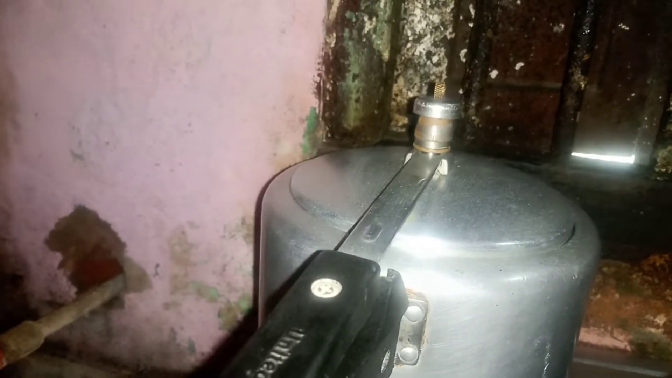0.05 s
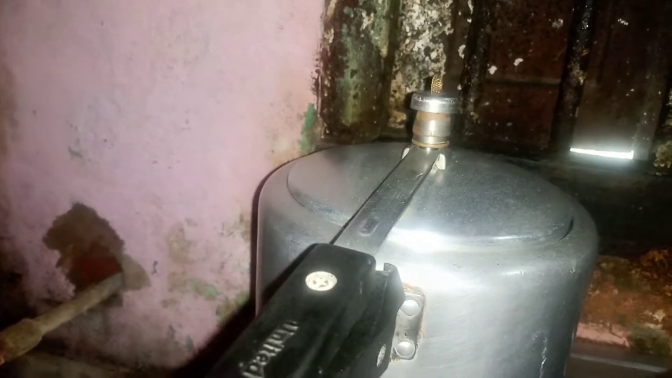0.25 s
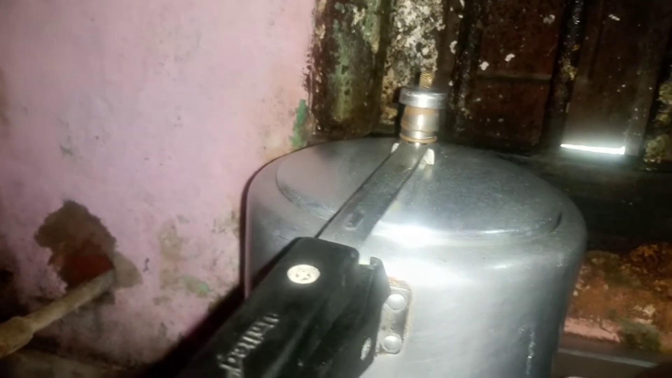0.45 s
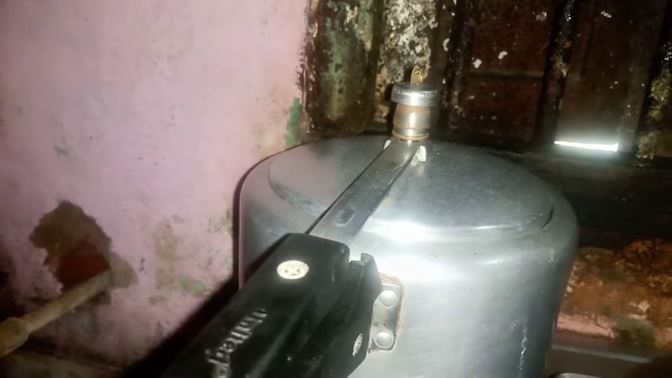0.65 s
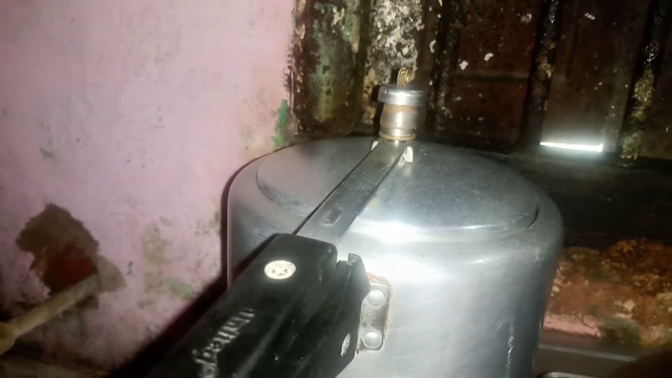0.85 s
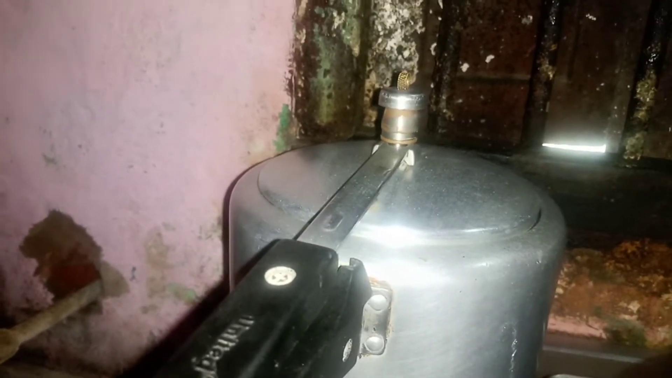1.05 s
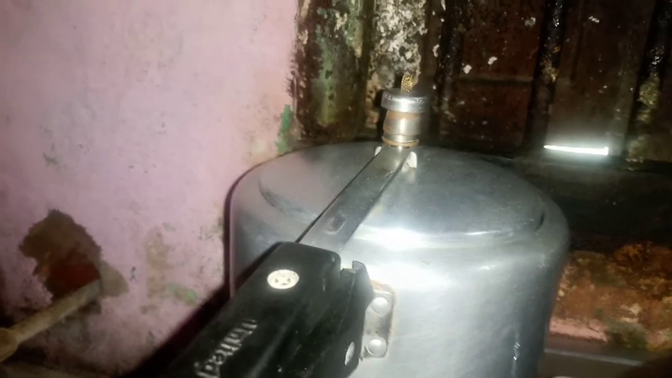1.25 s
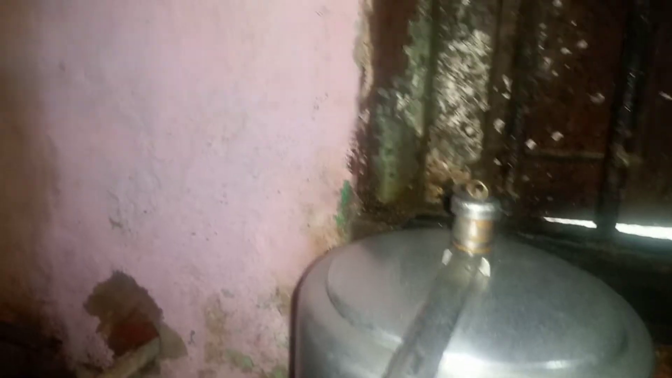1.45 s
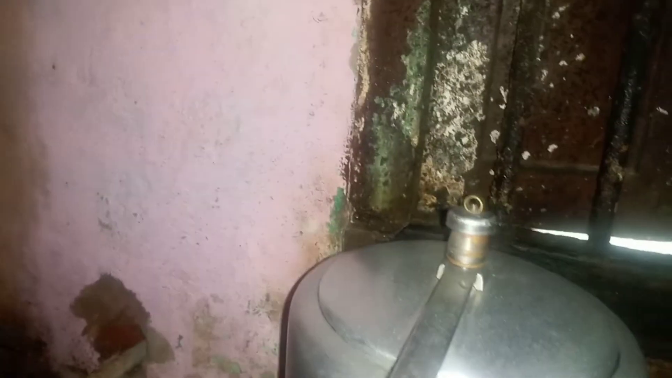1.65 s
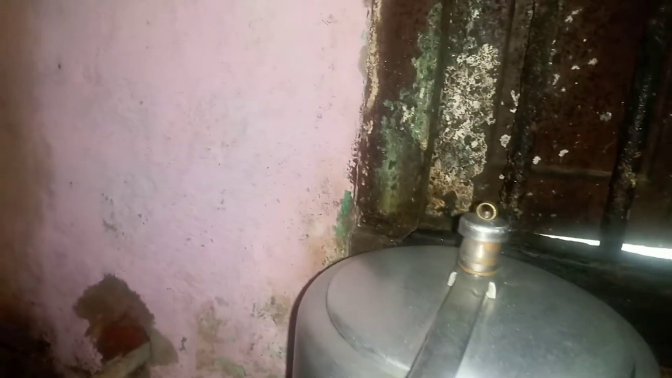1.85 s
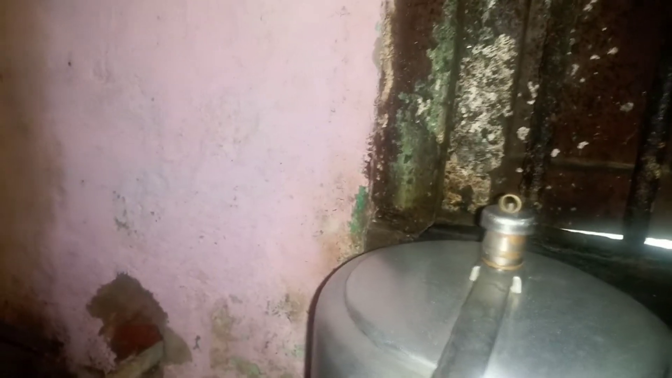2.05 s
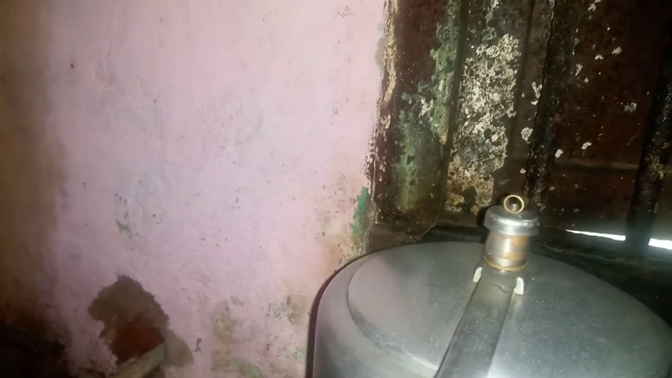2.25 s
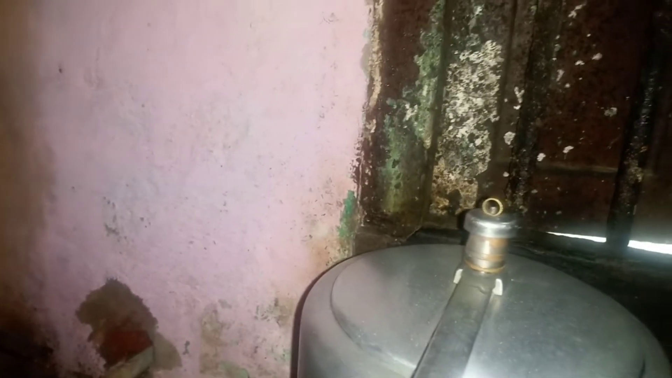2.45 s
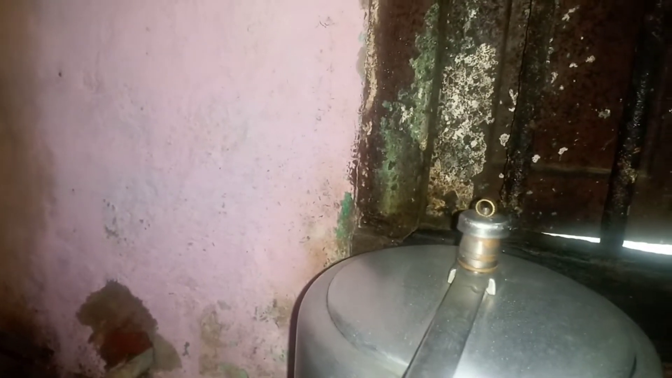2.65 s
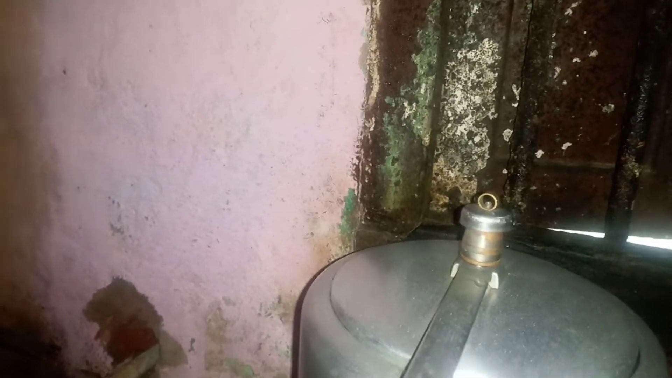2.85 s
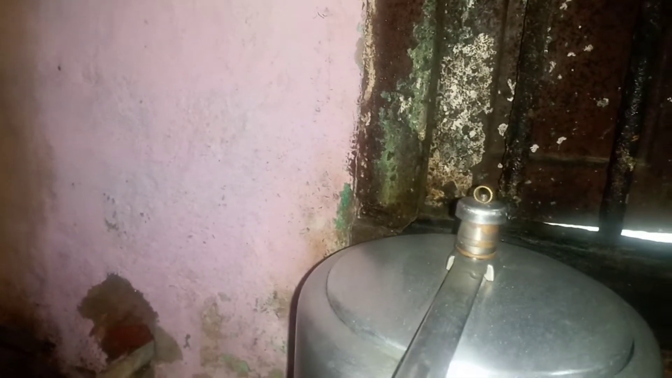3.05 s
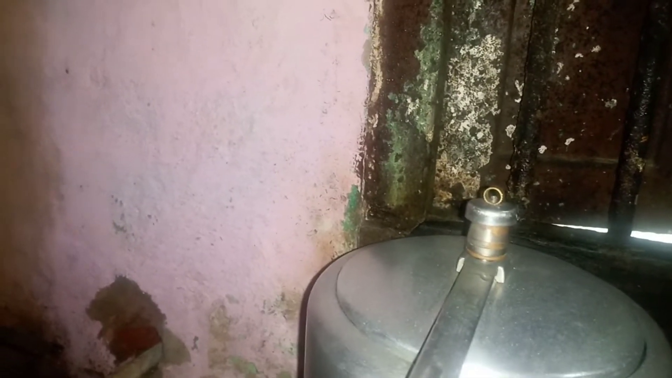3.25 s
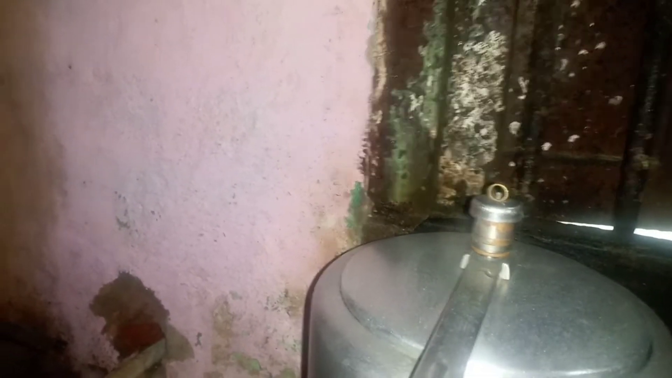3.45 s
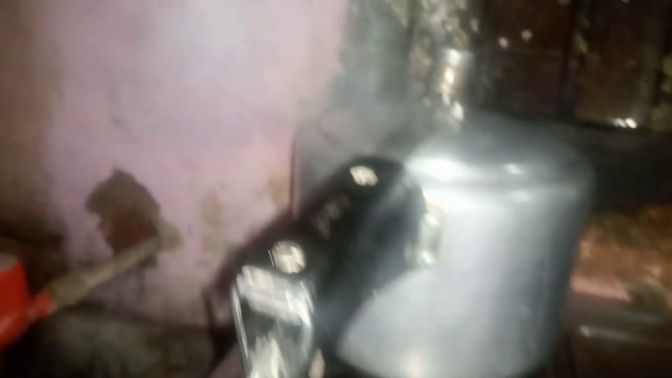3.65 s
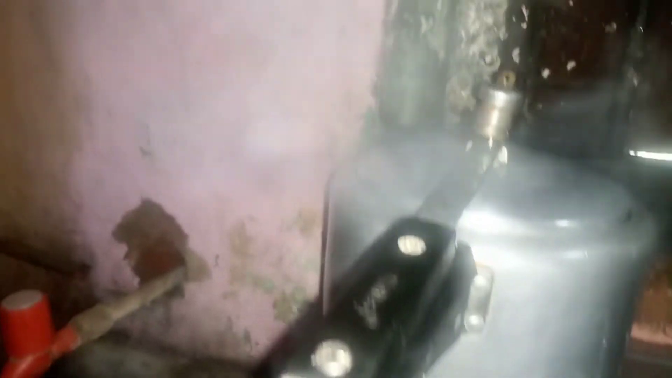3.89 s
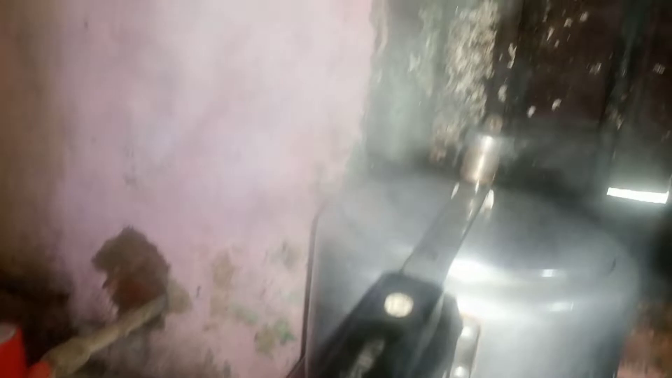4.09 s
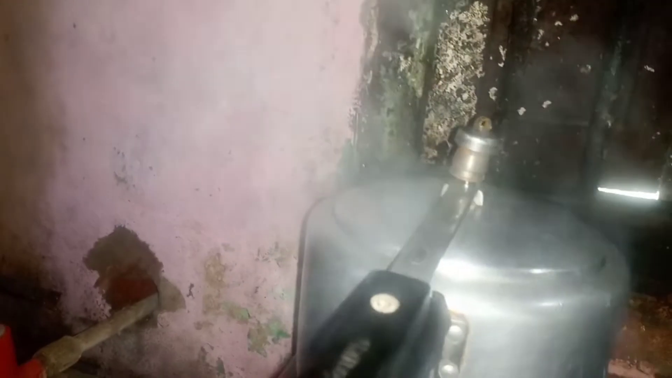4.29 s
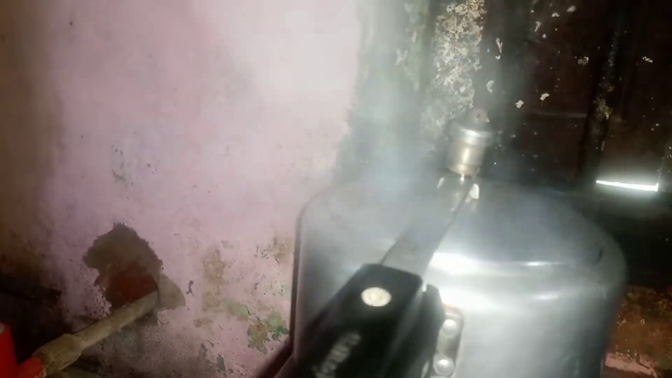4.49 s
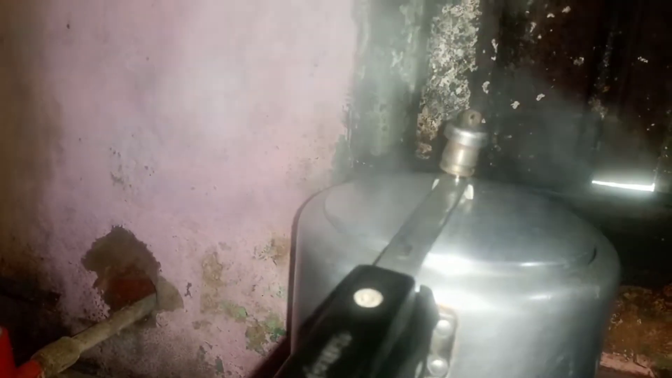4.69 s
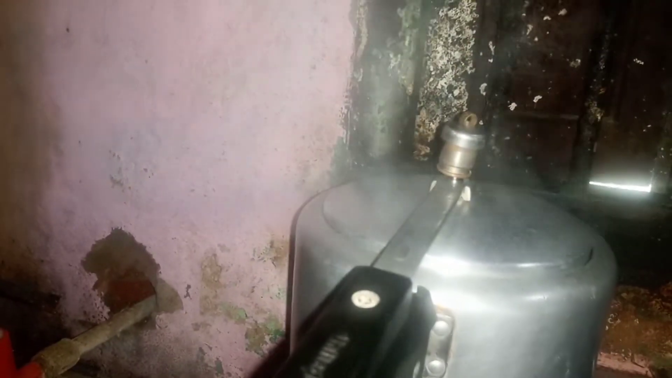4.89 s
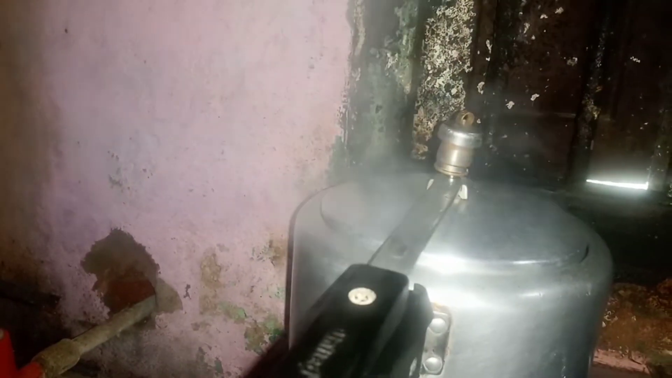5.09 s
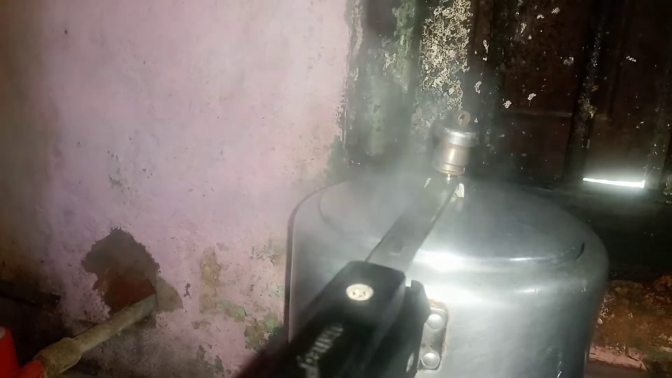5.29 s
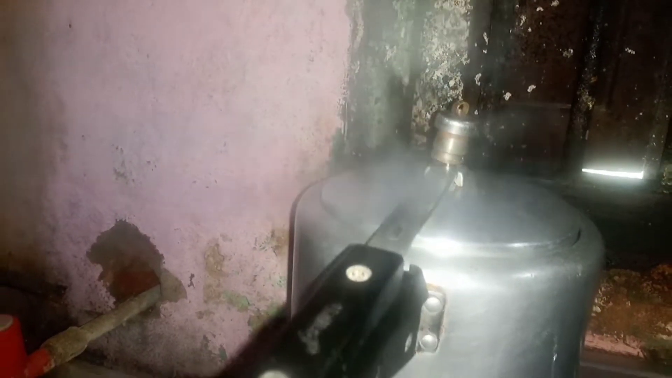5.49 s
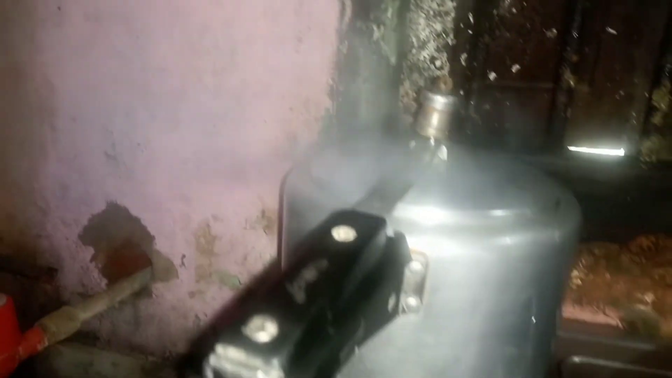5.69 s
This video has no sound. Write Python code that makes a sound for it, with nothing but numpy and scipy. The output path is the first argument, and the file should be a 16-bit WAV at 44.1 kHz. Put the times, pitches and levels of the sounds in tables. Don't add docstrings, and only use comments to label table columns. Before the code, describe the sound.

A pressure cooker on a gas flame, heard very close in a small kitchen with short hard reflections. From 0 to 1.2 seconds, steam leaks as a bright, grainy hiss, strongest around 6 to 7 kHz, fluttering and choking noticeably near 0.45 and 1.05 seconds. A faint low burner rumble, bubbling simmer and narrow pot hum lie underneath, the hum swelling around 0.3 to 0.45. The sound stops dead for under a tenth of a second. From 1.3 to 3.46 a much weaker leak fades in, thin and shifting in colour, lifting slightly near 2 and 2.7, with small hum swells. After another brief silence, from 3.54 a strong, steadier jet quickly rises into a piercing, airy roar. From about 3.6 its turbulent wind hits the microphone in irregular pops, clicks and short thuds, densest around 4.1 to 4.55, continuing in gusts to the end without fading.

```python
import sys
import numpy as np
from scipy import signal
from scipy.fft import rfft, irfft, next_fast_len
from scipy.io import wavfile
from scipy.ndimage import uniform_filter1d, map_coordinates

SR = 44100
rng = np.random.default_rng(int(sys.argv[2]) if len(sys.argv) > 2 else 0)


def int16_out(signal):
    q = np.round(np.clip(np.atleast_2d(signal).T, -1, 1) * 32767)
    wavfile.write(sys.argv[1], SR, q.astype(np.int16))


def how_loud(loudness_db):
    steps = np.asarray(loudness_db, float) / 20
    return 10 ** steps


N = 252693

# start [s], end [s], fade-in origin [s], fade-in length [s].
SPELLS = [
    (0, 1.2225, -1, .3),
    (1.2945, 3.458, 1.277, .33),
    (3.5445, 6, 3.527, .33),
]


def unit(x):
    return x / np.sqrt(np.mean(x ** 2) + 1e-20)


def along(points, hz):
    f, v = np.transpose(points)
    return np.interp(np.log(hz + 1), np.log(f + 1), v)


def curves(rows, t):
    s, *cols = np.transpose(rows)
    return [np.interp(t, s, c) for c in cols]


def bumps(rows, t):
    return sum(db * np.exp(-((t - s) / half_s) ** 2) for s, db, half_s in rows)


def filtered(x, response):
    m = next_fast_len(N + SR // 2)
    return irfft(rfft(x, m) * response(np.fft.rfftfreq(m, 1 / SR)), m)[..., :N]


def shaped_noise(colour):
    return unit(filtered(rng.standard_normal(N), lambda f: how_loud(along(colour, f))))


def patches(shape, bins, frames):
    smooth_in_hz = uniform_filter1d(rng.standard_normal(shape), int(bins), 0)
    return unit(uniform_filter1d(smooth_in_hz, int(frames), 1))


def wobble(rate_hz):
    knots = rng.standard_normal(int(N * rate_hz / SR) + 4)
    return map_coordinates(knots, [np.arange(N) * rate_hz / SR])


# rumble in dB, hum of the pot in dB, simmer in dB.
FLAME_LEVELS = [
    (-63.5, -62.5, -58.5),
    (-64.5, -66, -63),
]
# frequency in Hz, density in dB per Hz.
RUMBLE_COLOUR = [(20, -22), (50, -18), (100, 1), (220, 0), (350, -7.5), (430, -23.5)]
# frequency in Hz, density in dB per Hz.
SIMMER_COLOUR = [(300, -12.5), (410, -6.5), (560, 3.5), (740, 4.5), (880, -14), (1150, -26.5)]
# frequency in Hz, width in Hz.
POT_RESONANCE = (285, 41)
# time in s, level change in dB, half width in s.
FLARES_AND_SINKS = [
    (.09, 1.5, 0.08),
    (.19, -6, 0.025),
    (1.6, 0, .08),
    (2.8, -9, 0.045),
    (3.1, -2, .06),
    (3.45, 8.5, 0.04),
]
# time in s, level change in dB, half width in s.
HUM_SWELLS = [
    (.19, -11, .04),
    (.3, 10, 0.055),
    (.44, 12.5, 0.067),
    (1.67, 8, .06),
    (2.14, 6, 0.051),
    (2.59, 8, .06),
    (3.28, 8, 0.061),
]


def flame():
    t = np.arange(N) / SR
    steady_db = np.where(t < SPELLS[1][0], *np.array(FLAME_LEVELS)[..., None])
    rumble_db = steady_db[0] + 1.7 * wobble(9) + bumps(FLARES_AND_SINKS, t)
    hum_db = steady_db[1] + 1 * wobble(9) + bumps(HUM_SWELLS, t)
    simmer_db = steady_db[2] + 1.5 * wobble(9)
    rumble = shaped_noise(RUMBLE_COLOUR)
    simmer = shaped_noise(SIMMER_COLOUR)
    c, w = POT_RESONANCE
    resonance = lambda f: (1j * f * w / (c * c - f * f + 1j * f * w)) ** 2
    hum = unit(filtered(rng.standard_normal(N), resonance))
    out = how_loud(rumble_db + 3) * rumble
    out += how_loud(simmer_db + 1.1 * wobble(14)) * simmer
    out += how_loud(hum_db - .7 + 2.6 * wobble(18)) * hum
    return out


# start in s, end in s, number of eddies.
GUST_SPANS = [(3.75, 3.81, 3), (3.9, 4.005, 8), (4.04, 4.1, 5), (4.11, 4.26, 16), (4.3, 4.38, 11),
              (4.44, 4.47, 3), (4.47, 4.525, 14), (4.53, 4.555, 2), (4.67, 4.74, 5), (4.785, 4.95, 14),
              (5, 5.11, 8), (5.18, 5.22, 3), (5.295, 5.345, 10), (5.37, 5.42, 5), (5.48, 5.53, 2),
              (5.61, 5.68, 3)]


def gusts():
    slots = []
    for start, end, count in GUST_SPANS:
        slot_s = (end - start) / count
        slots += [(start + slot_s * k, slot_s) for k in range(count)]
    start_s, slot_s = np.transpose(slots)
    place, strength, side, duration = rng.random((len(slots), 4)).T
    peak_db = -21.5 + 7.5 * strength ** 1.8
    sign = side - .66
    length_ms = .08 * 34 ** duration
    return start_s + slot_s * place, peak_db, sign, length_ms


def eddies(s, size, length_ms, rise_ms):
    t_ms = np.arange(400) / SR * 1000
    decay = np.exp(-t_ms / length_ms[:, None]) + 1.2 * np.exp(-t_ms / .08)
    pulse = (1 - np.exp(-t_ms / rise_ms)) * decay
    pulse = pulse * (size / pulse.max(1))[:, None]
    at = np.round(s * SR).astype(int)[:, None] + np.arange(len(t_ms)) - 5
    return np.bincount(at.ravel(), pulse.ravel(), N + SR)[:N]


# time in s, peak in dB, sign, length in ms.
STRONG_POPS = [(3.628, -16, -1, 1), (3.7152, -17, -1, 1), (3.7288, -14, -1, .7), (3.8285, -15, -1, 1.5),
               (3.9124, -15, -1, .12), (3.9414, -11, 1, .12), (3.9559, -15, -1, 1), (4.1167, -10, -1, .08),
               (4.1778, -14, -1, 1), (4.2912, -14, -1, .08), (4.309, -13, -1, .7), (4.3466, -13, -1, .45),
               (4.3508, -12, -1, .45), (4.4458, -14, 1, .45), (4.4903, -13, -1, .12), (4.504, -12, 1, .12),
               (4.5467, -14, -1, .12), (4.7214, -12, 1, .08), (4.7761, -14, -1, .08), (4.784, -14, 1, .45),
               (4.875, -13, -1, .45), (5.0381, -15, -1, .7), (5.1058, -15, -1, .7), (5.1944, -14, 1, .12),
               (5.2473, -17, -1, 1), (5.2924, -15, 1, 3.2), (5.3145, -11, 1, 1.5), (5.4795, -16, -1, 1.5),
               (5.6294, -13, 1, .12), (5.6608, -13, 1, .12)]
# time in s, level in dB.
WEAK_LEVEL = [
    (3.55, -36.5),
    (3.8, -33.5),
    (4.2, -34),
    (4.5, -32),
    (5.3, -33),
    (5.5, -35.5),
    (5.7, -31.5),
]


def buffet():
    s, db, sign, length_ms = np.hstack([np.transpose(STRONG_POPS), gusts()])
    strong = eddies(s, np.sign(sign) * how_loud(db + 2), 1.1 * length_ms, rise_ms=.05)
    place, side, strength, duration, offset, crowd = rng.random((1400, 6)).T
    anywhere = SPELLS[2][0] + place * (N / SR - SPELLS[2][0])
    nearby = s[(place * len(s)).astype(int)] + .05 * (offset - .5)
    when = np.where(crowd < .25, nearby, anywhere)
    size = np.sign(side - .5) * np.minimum(how_loud(-3.5 * np.log(strength)), 2.6)
    weak_length_ms = .14 * np.exp(4.54 * duration)
    weak = eddies(when, size * how_loud(curves(WEAK_LEVEL, when)[0]), weak_length_ms, rise_ms=.045)

    def port(hz):
        ratio = hz / 87
        leak = (1j * ratio) ** 3 / (1 + 1j * ratio - ratio ** 2) / (1 + 1j * ratio)
        mesh = 1j * hz / (40 + 1j * hz) / (1 + 1j * hz / 9000)
        return leak * mesh

    return filtered(strong + how_loud(2) * weak, port)


# time in s, level in dB.
JET_LEVEL = [
    [(0, -27.5), (.155, -23), (.33, -26.5), (.6, -26.5), (.94, -27), (1.2, -26)],
    [(1.32, -38), (1.54, -37), (1.85, -38.5), (1.97, -34.5), (2.33, -36), (2.7, -33.5), (2.9, -36),
     (3.04, -36), (3.445, -36)],
    [(3.57, -22.5), (4.1, -22), (5.715, -21.5)],
]
# frequency in Hz, density in dB per Hz.
JET_COLOUR = [
    [(500, -50), (900, -26), (1500, -19), (2800, -19), (4000, -14), (6000, -11.5), (8000, -14.5),
     (10000, -17.5), (12000, -22), (13800, -19.5), (15500, -16)],
    [(500, -80), (900, -22.5), (1500, -19), (2800, -16.5), (4000, -17), (6000, -16), (8000, -12.5),
     (10000, -14), (12000, -23), (13800, -20), (15500, -14)],
    [(500, -36.5), (900, -31), (1500, -23.5), (2800, -18), (4000, -11.5), (6000, -7), (8000, -3.5),
     (10000, -7.5), (12000, -16), (13800, -24), (15500, -9.5)],
]
# frequency in Hz, width in Hz, dB over the colour.
CAP_RESONANCES = [
    [(2280, 380, 4.5), (5330, 800, 6.5), (6690, 1500, 11.5), (8920, 710, 4), (10960, 700, 9.5),
     (15300, 590, 0)],
    [(2150, 480, 1.5), (3200, 410, 3), (5450, 1060, 7), (6630, 1080, 12.0), (8850, 810, 7),
     (11400, 740, 5.5), (14560, 790, 7.5)],
    [(4300, 820, 6), (5680, 580, 4.5), (6590, 230, 8), (7130, 480, 5), (9840, 150, 1), (14200, 440, 11.5)],
]
# time in s, depth in dB, half width in s.
WEIGHT_CHOKES = [
    (.065, 2.5, .03),
    (.444, 8.5, 0.058),
    (.728, 3.5, .035),
    (1.043, 9.5, 0.032),
    (2.5, 2.5, 0.081),
    (3.17, 1.5, .09),
]
# time in s, frequency in Hz, depth in dB.
LID_DIP = [(0, 1970, 3), (.45, 1650, 3), (.6, 2390, 4), (.8, 3560, 6), (1.2, 3570, 8.5), (1.35, 3380, 1),
           (1.57, 3770, 9.5), (1.75, 2880, 1.5), (2.05, 2530, 4.5), (2.3, 1940, 4.5), (2.55, 2200, 6.5),
           (2.8, 2800, 9.5), (3.1, 3200, 8), (3.45, 3200, 6.5), (3.6, 3500, 1), (5.7, 3500, 1)]
FIZZ_LAGS, BREATH_LAGS = [.1, .7, .3], [.47, .55, .99]


def jet():
    hz, t, z = signal.stft(rng.standard_normal(N), SR, nperseg=512)
    hz, field_db = hz[:, None], np.zeros(z.shape)
    core = ((hz > 4500) & (hz < 7600)).ravel()
    above = lambda edge_hz: 1 / (1 + (edge_hz / (hz + 1)) ** 14)
    dip_hz, dip_db = curves(LID_DIP, t)
    unrest = np.where(t < SPELLS[2][0], 1, .45)
    tremor_db = [.23 * unrest * np.interp(t, np.arange(N) / SR, wobble(12)) for _ in range(2)]

    spells = zip(SPELLS, JET_LEVEL, JET_COLOUR, CAP_RESONANCES, FIZZ_LAGS, BREATH_LAGS)
    for (start, *_), rows, colour, cap, fizz_lag, breath_lag in spells:
        shape_db = along(colour, hz)
        shape_db = shape_db + sum(db / (1 + (2 * (hz - c) / w) ** 2) for c, w, db in cap)
        shape_db = shape_db - 10 * np.log10(np.sum(how_loud(2 * shape_db[core])) / len(hz))
        level_db = curves(rows, t)[0] - bumps(WEIGHT_CHOKES, t)
        during = (t > rows[0][0]) & (t < rows[-1][0])
        centred = lambda band_db: band_db - np.mean(band_db[during])
        fizz_db = centred(tremor_db[0] - fizz_lag * level_db)
        breath_db = centred(-breath_lag * level_db)
        edge_db = centred(tremor_db[1] - 2 * np.log2(dip_hz))
        aim_db = fizz_db * above(10300) + breath_db * (1 - above(4300))
        aim_db = aim_db + edge_db * (above(8300) - above(12400))
        now = t >= start - .03
        field_db[:, now] = (shape_db + level_db + aim_db)[:, now]

    field_db -= dip_db * np.exp(-(np.log((hz + 1) / dip_hz) / .26) ** 2)
    boost_db = .57 * dip_db / (1 + (dip_hz / 2900) ** 9)
    field_db += boost_db * np.exp(-(np.log((hz + 1) / (1.7 * dip_hz)) / .16) ** 2)
    patch_db = .62 * patches(z.shape, 2, 60) + .92 * patches(z.shape, 11, 12) + patches(z.shape, 15, 40)
    field_db += unrest * patch_db - .3
    flutter = how_loud(.69 * wobble(40) + .44 * wobble(300))
    return flutter * signal.istft(z * how_loud(field_db), SR, nperseg=512)[1][:N]


def kitchen(x, wet_db, t60_s):
    t, out = np.arange(SR // 4) / SR, np.zeros(N)
    for start, *_ in SPELLS:
        tail = rng.standard_normal(len(t)) * how_loud(-60 * t / t60_s)
        wet = signal.fftconvolve(x, tail / np.linalg.norm(tail))[:N]
        first = round(start * SR)
        out[first:] = (x + how_loud(wet_db) * wet)[first:]
    return out / np.sqrt(1 + how_loud(2 * wet_db))


def scene():
    mono = kitchen(jet(), wet_db=-8.5, t60_s=.14) + flame() + buffet()
    return np.tile(mono, (2, 1))


def dropouts(x, rarity, depth_db, below_hz):
    hz, t, z = signal.stft(x, SR, nperseg=1024)
    power = uniform_filter1d(uniform_filter1d(abs(z[0]) ** 2, size=4, axis=0), size=20, axis=1)
    level_db = 10 * np.log10(power + 1e-14)
    valley_db = uniform_filter1d(level_db, size=44, axis=0) - level_db
    odds = patches(level_db.shape, 5, 5) + .4 * np.clip(valley_db, -4, 4)
    muted = np.clip(9 * (odds - rarity), 0, 1) * (hz[:, None] < below_hz) * (t < SPELLS[2][0])
    return signal.istft(z * how_loud(-depth_db * muted), SR, nperseg=1024)[1][:, :N]


def top_cut(x):
    return signal.sosfilt(signal.butter(12, 16870, fs=SR, output="sos"), x)


def record(dry):
    t = np.arange(N) / SR
    gate = np.zeros(N)
    for start, end, origin, length in SPELLS:
        gate += (t >= start) * (t < end) * np.clip((t - origin) / length, 0, 1)
    kept = dropouts(dry, rarity=2.45, depth_db=20, below_hz=4300) * gate
    band_limit = lambda hz: how_loud(-110 * np.clip((hz - 15870) / 190, 0, 1) ** 1.5)
    return top_cut(filtered(kept, band_limit))


dry = scene()
out = record(dry)
int16_out(out)
```